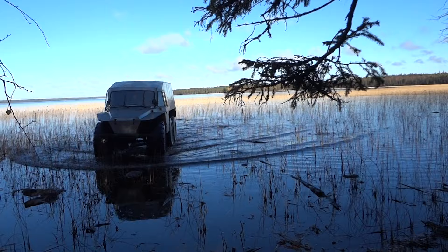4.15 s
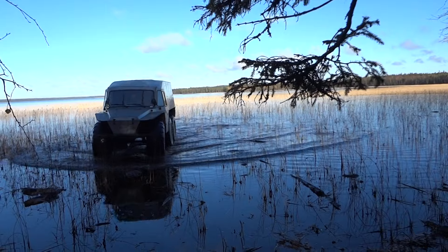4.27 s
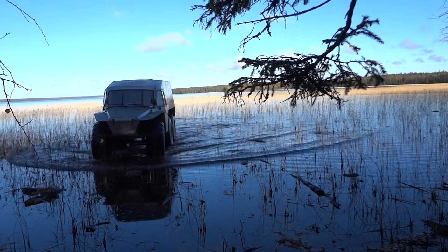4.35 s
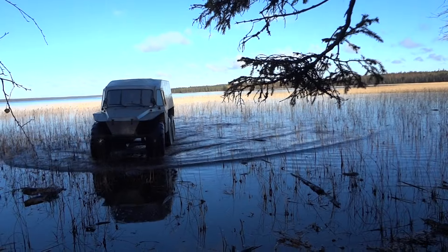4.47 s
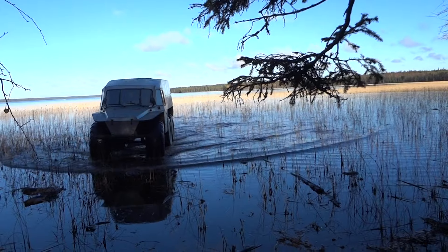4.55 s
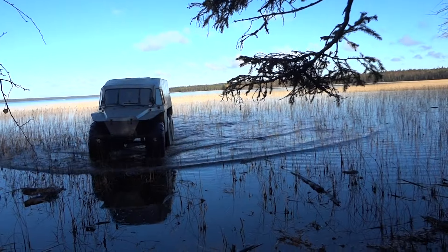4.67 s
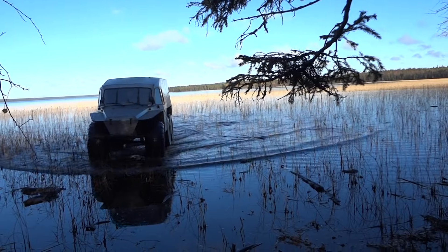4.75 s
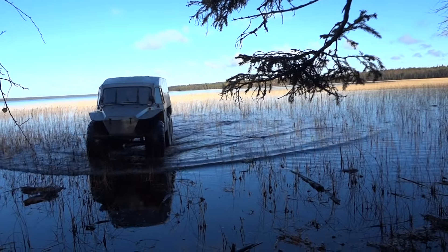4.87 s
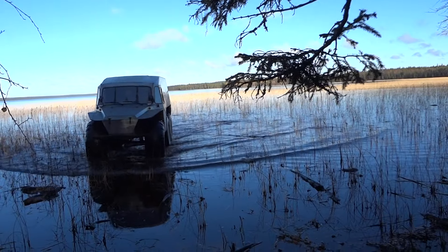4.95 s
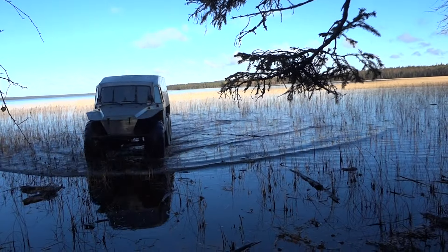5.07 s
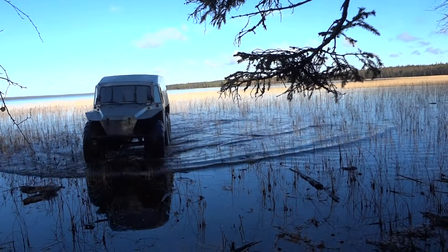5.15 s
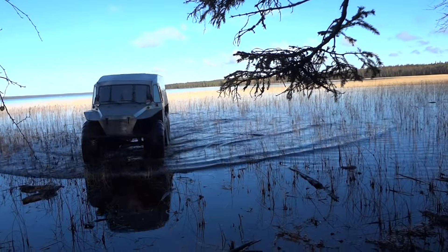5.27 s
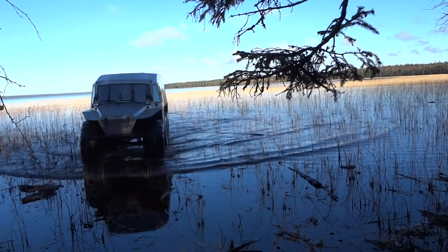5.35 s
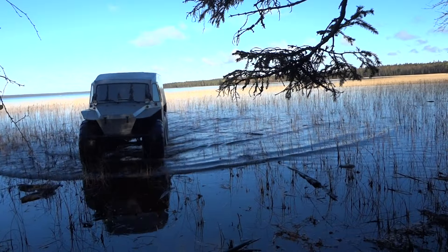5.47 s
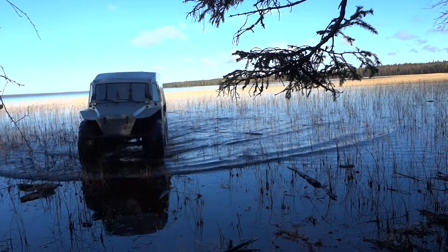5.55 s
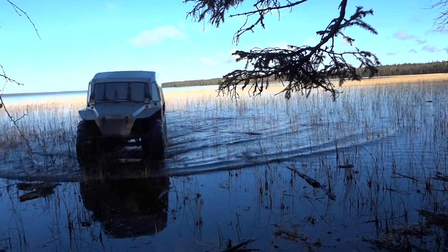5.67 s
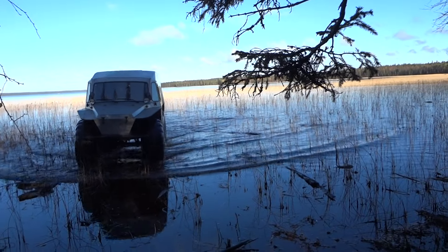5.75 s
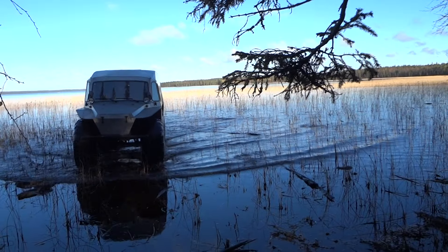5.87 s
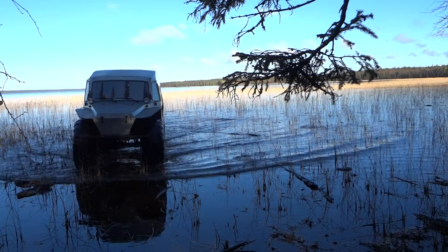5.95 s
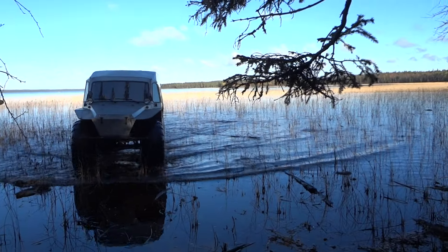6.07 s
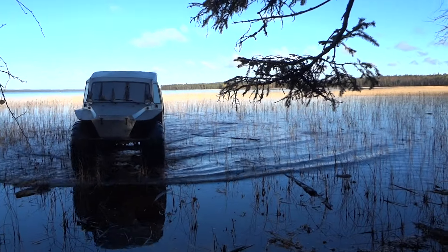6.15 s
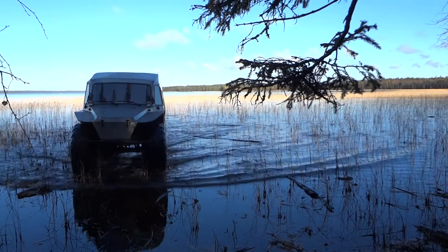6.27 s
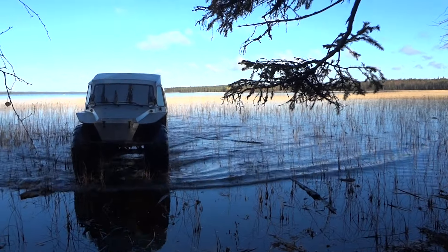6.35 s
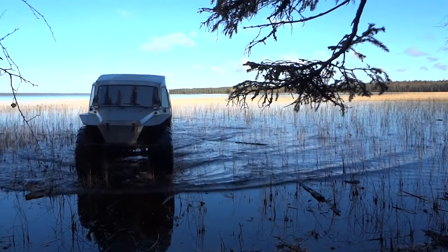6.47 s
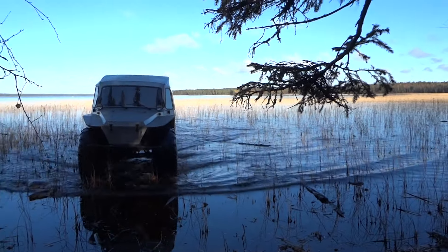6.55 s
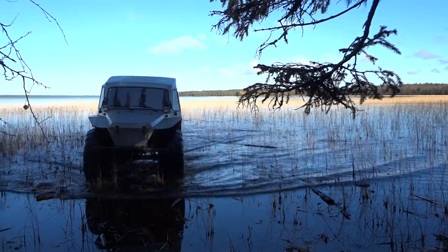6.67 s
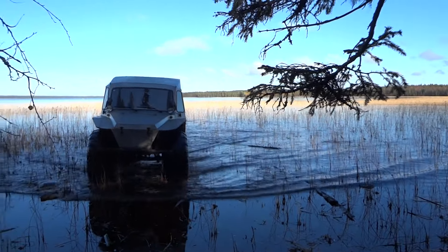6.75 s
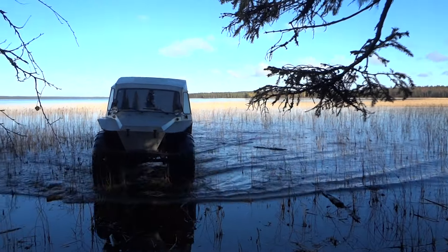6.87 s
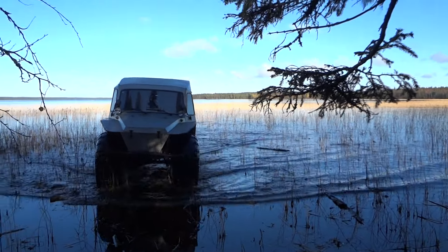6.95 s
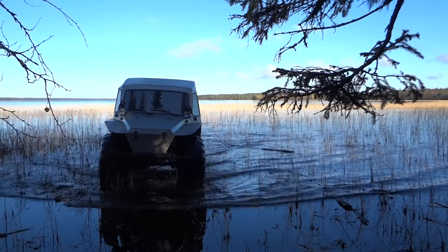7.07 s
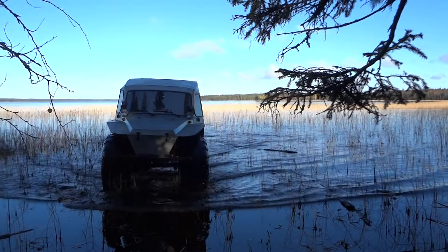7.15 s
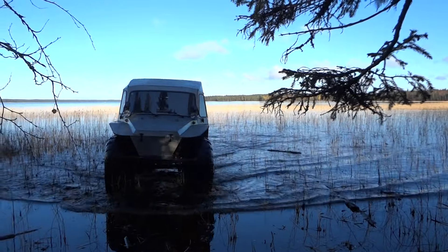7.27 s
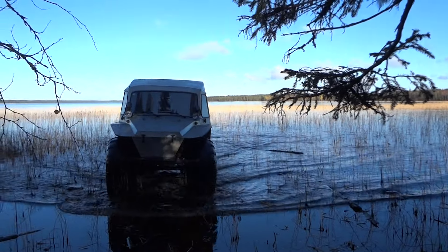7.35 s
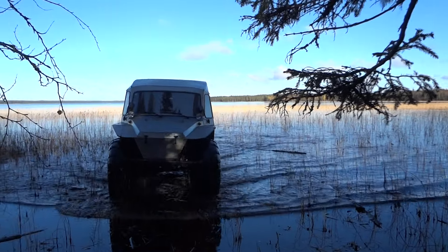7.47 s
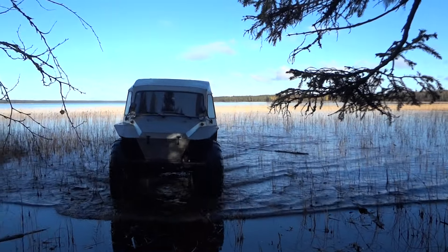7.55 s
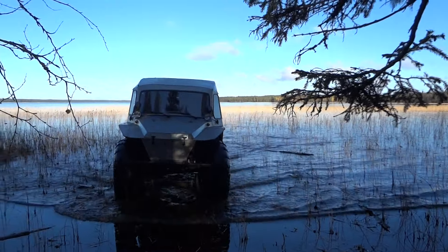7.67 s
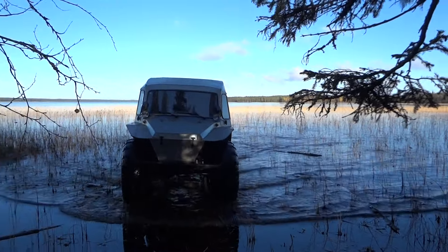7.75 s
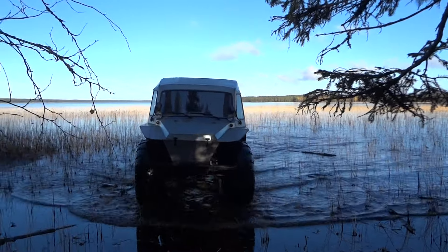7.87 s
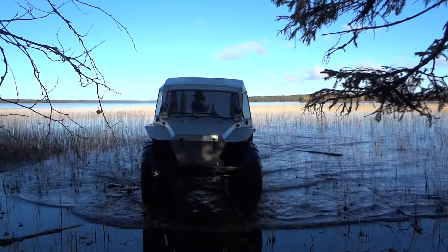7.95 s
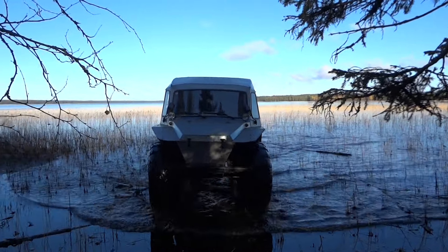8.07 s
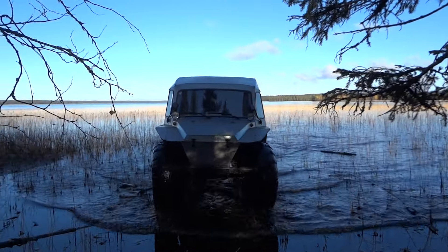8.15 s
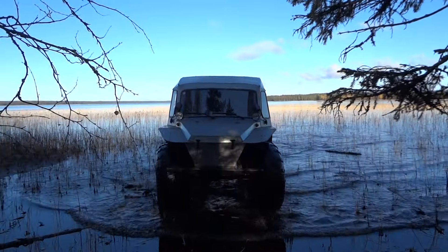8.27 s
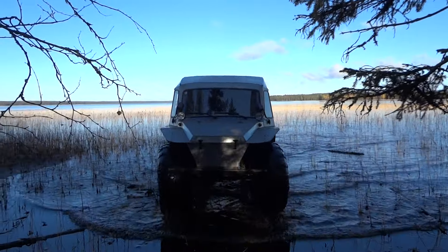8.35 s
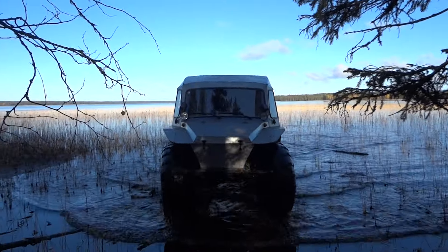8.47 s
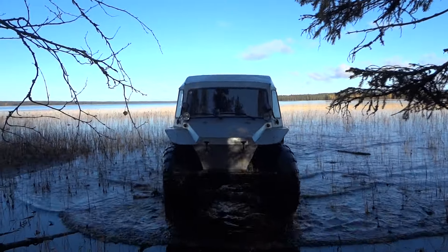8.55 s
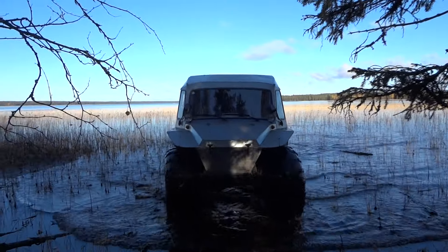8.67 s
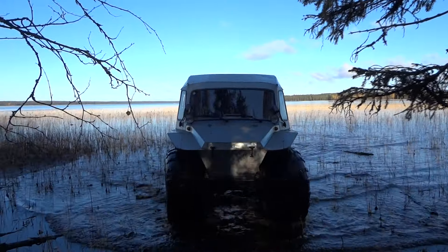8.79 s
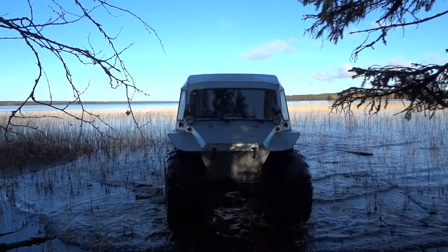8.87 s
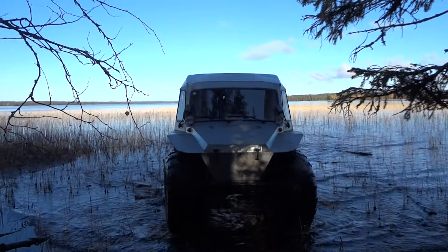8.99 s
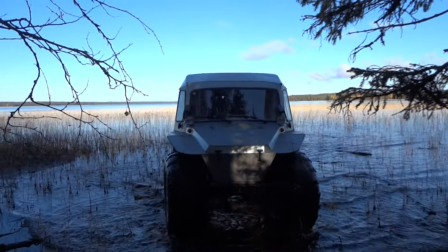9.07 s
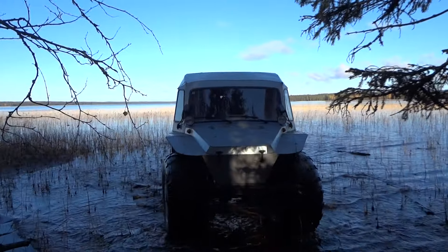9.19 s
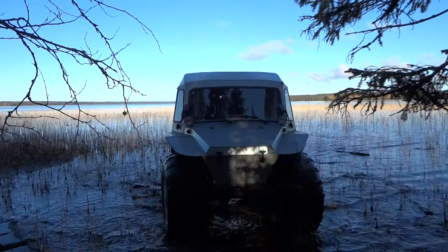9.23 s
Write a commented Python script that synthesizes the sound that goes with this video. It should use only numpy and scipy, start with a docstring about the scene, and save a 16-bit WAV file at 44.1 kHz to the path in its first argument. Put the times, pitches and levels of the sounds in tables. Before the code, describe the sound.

Outdoors at a reedy lake shore, a big-wheeled vehicle wades toward a fixed, close-paired stereo microphone. Its muffled low engine drones steadily with soft surges about once a second, over a dull hull rumble. Tyres churn water continuously; from about three seconds it comes closer, and the wash grows louder and brighter, with more splashes, gurgles and a deep plop near the end.

```python
"""In a shallow, reedy lake, a big-wheeled all-terrain vehicle wades towards a listener on the shore.
Its muffled engine, a stack of sine notes tied to the shaft, drones and surges about once a second;
between surges it slows from about 1850 to 1670 rpm. The hull and tyres add a rumble of filtered noise.
The tyres churn the water: clouds of ringing bubbles over noise grow louder and brighter as it nears.
Single plops (sines rising in pitch) and splashes (short, ragged bursts of noise) stand out on top."""
import sys
import numpy as np
from scipy import signal
from scipy.fft import rfft, irfft, next_fast_len
from scipy.io import wavfile
from scipy.ndimage import uniform_filter1d, map_coordinates

SR = 44100
rng = np.random.default_rng(int(sys.argv[2]) if len(sys.argv) > 2 else 0)


def waveform_to_disk(signal):
    """Save audio, clipped to [-1, 1], as 16-bit WAV at the path in sys.argv[1]."""
    frames = np.transpose(np.atleast_2d(signal))
    scaled = np.clip(frames, -1, 1) * 32767
    samples = np.round(scaled).astype(np.int16)
    wavfile.write(sys.argv[1], SR, samples)


N = 424241  # length in samples, about 9.6 s


def amp(db):
    """Turn decibels into a gain."""
    return 10 ** (np.asarray(db) / 20)


def unit(x):
    """Scale a signal to an rms (average strength) of 1."""
    return x / np.sqrt(np.mean(x ** 2) + 1e-20)


def along(points, hz):
    """Read a value between (f/Hz, value) points, with frequency on a log axis."""
    f, value = np.transpose(points)
    return np.interp(np.log(hz + 1), np.log(np.abs(f) + 1), value)


def curves(rows):
    """Turn each column after the time into a curve with one value per sample."""
    times, *columns = np.transpose(rows)
    return [np.interp(np.arange(N) / SR, times, column) for column in columns]


def wobble(rate):
    """Draw a smooth random curve through `rate` random points a second."""
    coarse = np.arange(0, N + 32, 32)
    knots = rng.standard_normal(4096)
    smooth = map_coordinates(knots, [coarse * rate / SR], mode="wrap")
    return np.interp(np.arange(N), coarse, smooth)


def filtered(x, response):
    """Multiply the spectrum of x by a response (a function of frequency, possibly complex)."""
    m = next_fast_len(N + 8192, True)
    return irfft(rfft(x, m) * response(np.fft.rfftfreq(m, 1 / SR)), m)[..., :N]


def coloured(x, spectrum):
    """Filter x by a table of gains, then bring it to rms 1."""
    return unit(filtered(x, lambda hz: amp(along(spectrum, hz))))


# The vehicle first keeps its distance, then rolls towards the shore: (t/s, distance/m)
DISTANCE = [(0, 13.5), (3, 13.5), (5, 10.54), (6.5, 9.3), (8, 7.9), (9.62, 6.2)]


def closer_db():
    """Level gained since the start: sound grows as one over the distance."""
    metres = curves(DISTANCE)[0]
    return 20 * np.log10(metres[0] / metres)


# Surges of the engine: (t/s at the top, extra speed/turns per second, length/s)
SURGES = [(0.25, 1.72, 1.17), (1.35, 2.36, 1.38), (2.34, 1.89, 1.08), (3.38, 0.63, 0.74),
          (4.14, 0.65, 0.77), (5.02, 1.12, 0.9), (5.64, 0.73, 0.67), (6.33, 2.02, 0.85), (7.22, 2.09, 1.1),
          (8.16, 1.29, 0.89), (9.23, 0.83, 0.58)]


def surging():
    """Extra shaft speed: each surge swells and falls back as a smooth bell."""
    t = np.arange(N) / SR
    extra_speed = np.zeros(N)
    for top_s, extra, length in SURGES:
        extra_speed += extra * np.cos(np.pi * np.clip((t - top_s) / length, -.5, .5)) ** 2
    return extra_speed


# Engine speed between surges, slowing near the shore: (t/s, crankshaft speed/turns per second)
CRUISE = [(0, 30.9), (5.9, 30.93), (6.7, 29.83), (7.8, 29.76), (8.8, 28.7), (9.62, 27.8)]
# Resonances of the exhaust, as the rms level of a strong note at the starting distance,
# before load and wavering: (f/Hz, level/dB)
EXHAUST = [(55, -35), (66, -30), (84, -36.5), (100, -38), (112, -31), (125, -42), (134, -39.5), (168, -35),
           (179, -27), (198, -30.5), (226, -46), (252, -37), (270, -37), (286, -36), (305, -44.5),
           (400, -52.5)]
# Pitches of the strong and of the faint notes: (multiple of the shaft rate)
STRONG_ORDERS = (2, 3, 4, 6, 8)
FAINT_ORDERS = (5, 7, 9, 10, 11, 12)
# How load lifts each strong note: (gain/dB per extra turn a second)
LOAD_DB = [.65, .2, .3, .3, 0.66]
# Each faint note against a strong one of the same pitch: (level/dB)
FAINT_DB = [-16, -18, -9.5, -6, -6, -11.5]


def engine():
    """Two firings a turn make even orders, unequal cylinders odd ones; load and exhaust set their levels."""
    extra = surging()
    speed = curves(CRUISE)[0] + extra
    jitter = 0.0061 * wobble(25)  # radians
    turn = 2 * np.pi * np.cumsum(speed) / SR + jitter
    notes = np.zeros(N)
    for order, load_db in zip(STRONG_ORDERS, LOAD_DB):
        db = along(EXHAUST, order * speed) + load_db * extra + 0.29 * wobble(20)
        polarity = 1 if order == 2 else -1  # the muffler inverts all above the firing note
        notes += polarity * amp(db) * np.sin(order * turn)
    for order, weaker_db in zip(FAINT_ORDERS, FAINT_DB):  # these waver in strength and timing
        db = along(EXHAUST, order * speed) + weaker_db + 1.6 * wobble(5)
        notes += amp(db) * np.cos(order * turn + 1.1 * wobble(1.206))
    uneven_db = 0.27 * wobble(45)  # no two firings are quite equally strong
    return np.sqrt(2) * notes * amp(closer_db() + uneven_db)  # sqrt(2) turns rms into peak


# Colour of the dull rumble from hull and tyres: (f/Hz, level/dB per Hz)
RUMBLE = [(12, -45), (25, -27), (45, -9), (90, 2.5), (150, -5), (230, 1.5), (310, 3), (390, -1), (480, -11),
          (700, -20), (1500, -78)]
# Colour of a body panel ringing faintly: (f/Hz, level/dB per Hz)
PANEL = [(1500, -60), (1830, -13), (1887, -10), (1945, -10), (2400, -65)]
HULL_DB, PANEL_DB = -40.5, -51.5  # rms levels at the start
HULL_GROWS = 1.52  # dB per dB gained by coming closer


def rumble():
    """The hull and the rolling tyres stir a dull, uneven rumble; a panel of the body rings on top."""
    low = amp(HULL_DB + 1.1 * wobble(14)) * coloured(rng.standard_normal(N), RUMBLE)
    ring = amp(PANEL_DB + 2.7 * wobble(8)) * coloured(rng.standard_normal(N), PANEL)
    return amp(HULL_GROWS * closer_db()) * (low + ring)


def bubbles(lo_hz, hi_hz, cycles, spread_db, rise, count, size):
    """A cloud of damped sines of random pitch and strength, each gliding up as it dies."""
    when, pitch, strength = rng.random((count, 3)).T[:, :, None]
    hz = lo_hz + (hi_hz - lo_hz) * pitch
    age = np.arange(size) * hz / SR / cycles  # 1 after the given number of cycles
    gain = amp(-spread_db * np.log(1 - .985 * strength)) * hz / hi_hz
    glide = 1 + rise * np.minimum(age, 2) / 2
    rings = gain * np.exp(-3 * age) * np.sin(2 * np.pi * cycles * age * glide)
    at = (when * N).astype(int) + np.arange(size)
    return unit(np.bincount(at.ravel(), rings.ravel(), N)[:N])  # adds up all the rings


def froth(grains, spectrum, wash_db, patchy_db, side_db):
    """Near bubbles over a noise wash of countless far ones, in random patches of time and pitch, in stereo."""
    mixed = grains + amp(wash_db) * rng.standard_normal(N)
    z = signal.stft(mixed, nperseg=512)[2]
    field = uniform_filter1d(rng.standard_normal(z.shape), size=7, axis=0)
    field = uniform_filter1d(field, size=7, axis=1)
    patchy = signal.istft(z * amp(patchy_db * unit(field)), nperseg=512)[1][:N]
    mid = coloured(patchy, spectrum)
    side = amp(side_db) * coloured(rng.standard_normal(N), spectrum)
    return np.array([mid + side, mid - side])


# Water thrown by the tyres; only its rise and fall around the mean counts: (t/s, level/dB)
WASH = [(0.0, -35.5), (1.63, -32), (3.96, -31), (5.09, -29.5), (5.52, -30.5), (6.83, -26.5), (7.5, -28),
        (8.33, -25.5), (9.46, -25), (9.62, -23.5)]


def wash_swell_db():
    """How far the thrown water is above or below its mean level."""
    wash_db = curves(WASH)[0]
    return wash_db - wash_db.mean()


# Filter colours, from large bubbles to fine drops: (f/Hz, gain/dB)
CHURN = [(250, -37), (450, -13.5), (600, 2), (750, 4), (950, -4.5), (1150, -7), (1500, -16.5), (2000, -16),
         (4000, -59)]
SPLASHING = [(700, -12), (1400, 2), (1900, -0.5), (2300, 1.5), (2800, 0.5), (3700, -2), (4600, -6.5),
             (6000, -20), (10000, -39)]
SPRAY = [(2500, 5.5), (4500, -2.5), (5400, 3), (6500, 0), (7500, -1.5), (9500, -3.5), (12000, -20),
         (15800, -17)]
# Filter colours of the bow wave, its gurgle and its fizz: (f/Hz, gain/dB)
GURGLE = [(700, -30), (1050, -2.5), (1350, 1.5), (1600, -7.5), (2100, -17), (4000, -62)]
FIZZ = [(6000, -34), (9000, -3), (10800, -2), (13000, -6), (15800, -12)]
CHURN_DB, SPLASHING_DB, SPRAY_DB = -31, -37, -39  # at the mean level of the wash
CHURN_GROWS, SPLASHING_GROWS, SPRAY_GROWS = 0.75, 1.06, 1.12  # dB per dB of wash: more is brighter
GURGLE_DB, FIZZ_DB = -47, -57  # at the start
BOW_GROWS = 2.1  # dB per dB gained by coming closer


def water():
    """Treads churn up large bubbles; water falling off the tyres splashes and bursts into spray."""
    swell_db = wash_swell_db() + 0.35 * wobble(4)
    sheets, patter = wobble(16), wobble(70)  # each sheet of water drives large, small and fine together
    large = bubbles(393, 1680, cycles=8.8, spread_db=0.5, rise=0.22, count=7000, size=700)
    small = bubbles(1016, 5790, cycles=5.4, spread_db=2.0, rise=0.16, count=14000, size=260)
    drops = bubbles(4180, 16700, cycles=8.7, spread_db=4.0, rise=.05, count=14000, size=70)
    churn_db = CHURN_DB + CHURN_GROWS * swell_db + 0.27 * sheets + 0.28 * wobble(60)
    splashing_db = SPLASHING_DB + SPLASHING_GROWS * swell_db + 0.48 * sheets + 0.32 * patter
    spray_db = SPRAY_DB + SPRAY_GROWS * swell_db + 0.19 * sheets + 0.69 * patter
    churn = amp(churn_db) * froth(large, CHURN, wash_db=7, patchy_db=.5, side_db=-18.5)
    splashing = amp(splashing_db) * froth(small, SPLASHING, wash_db=6, patchy_db=0.6, side_db=-18.5)
    spray = amp(spray_db) * froth(drops, SPRAY, wash_db=5.0, patchy_db=0.53, side_db=-36)
    # close up, the bow wave's own gurgle and fizz come through
    middling = bubbles(966, 1990, cycles=8.8, spread_db=1.0, rise=0.07, count=4000, size=600)
    gurgle_db = GURGLE_DB + 0.36 * sheets
    gurgle = amp(gurgle_db) * froth(middling, GURGLE, wash_db=7.5, patchy_db=1.5, side_db=-28)
    tiny = bubbles(5500, 13700, cycles=4, spread_db=3.5, rise=.05, count=30000, size=40)
    fizz_db = FIZZ_DB + 0.81 * patter
    fizz = amp(fizz_db) * froth(tiny, FIZZ, wash_db=0, patchy_db=1.0, side_db=-43)
    bow_wave = amp(BOW_GROWS * closer_db()) * (gurgle + fizz)
    return churn + splashing + spray + bow_wave


# Single bubbles and drips: (t/s, level/dB from which the ring dies away, f/Hz at the start)
PLOPS = [(.243, -33, 8100), (2.941, -25, 2000), (4.488, -27, 9100), (8.515, -18.5, 1900),
         (8.528, -19, 2000), (9.153, -6.5, 690)]


def plops():
    """An air pocket rings briefly, rising in pitch; small ones ring for more cycles."""
    out, t = np.zeros(N + SR), np.arange(SR // 10) / SR
    for s, db, hz in PLOPS:
        t60 = .028 * (hz / 700) ** -.15  # seconds to fall by 60 dB
        onset = 1 - np.exp(-t / .0003)
        ring = np.sin(2 * np.pi * hz * t * (1 + 3 * t)) * onset
        out[round(s * SR):][:len(t)] += amp(db - 60 * t / t60) * ring
    return out[:N]


def small_splashes(count):
    """Extra splashes at random times and pitches, louder as the wash grows; rows like those of SPLASHES."""
    when, strength, pitch = rng.random((count, 3)).T
    lo_hz, hi_hz = 700, 4200  # range of centres
    at = (when * N).astype(int)
    level_db = -33.5 + wash_swell_db()[at] + 5 * strength
    centres_hz = lo_hz * (hi_hz / lo_hz) ** pitch
    length = .035  # seconds
    return [(s, db, hz, length) for s, db, hz in zip(when * N / SR, level_db, centres_hz)]


# Single splashes and gulps:
# (t/s, level/dB before fading and dulling, centre f/Hz, length/s in which it fades by 24 dB)
SPLASHES = [(2.048, -24, 750, .068), (2.936, -26, 6160, 0.021), (3.225, -30, 3500, 0.023),
            (3.641, -33, 7000, 0.018), (4.673, -28, 2300, 0.052), (5.409, -31, 792, 0.045),
            (5.452, -28, 2200, .056), (5.485, -30, 11000, .025), (5.734, -24, 730, 0.031),
            (5.93, -23, 950, .07), (5.963, -29, 4480, 0.023), (6.295, -27, 3000, .02),
            (6.635, -21.5, 735, 0.079), (7.038, -21, 790, .035), (8.078, -20, 800, .064),
            (8.08, -27, 5500, .09), (8.51, -19.5, 1150, .08), (8.979, -23.5, 10170, 0.016),
            (9.12, -24, 750, 0.047), (9.19, -24, 4500, .025), (9.256, -22, 8500, .032),
            (9.361, -25, 8000, 0.026), (9.455, -21, 1400, .05), (9.569, -17.5, 1500, 0.028),
            (9.576, -17, 3500, .02)]
# Treble lost on the way from a splash: (f/Hz, gain/dB)
DULLING = [(6000, -0.5), (9500, -4), (12000, -4), (15800, -16)]


def splashes():
    """A slap of water: a ragged burst of droplets around one size, thinning out over its length."""
    out, t = np.zeros(N + SR), np.arange(SR // 5) / SR
    hz = np.fft.rfftfreq(len(t), 1 / SR) + 1
    for s, db, centre_hz, length in list(SPLASHES) + small_splashes(count=22):
        band = amp(-7 * np.log2(hz / centre_hz) ** 2)
        droplets = unit(irfft(rfft(rng.standard_normal(len(t))) * band, len(t)))
        ragged_db = 2.0 * unit(uniform_filter1d(rng.standard_normal(len(t)), size=60))
        onset = 1 - np.exp(-15 * t / length)
        out[round(s * SR):][:len(t)] += amp(db + ragged_db - 24 * t / length) * droplets * onset
    return filtered(out[:N], lambda hz: amp(along(DULLING, hz)))


# Strength of an early reflection: (f/Hz, gain as a plain factor)
MIRROR = [(100, .02), (450, 0.36), (1500, .23), (3200, .38), (5500, 0.28), (8000, 0.16), (15000, .08)]
# Its delay drifts slowly: (t/s, delay/ms)
MIRROR_DELAY = [(0, 1.15), (1.5, 1.12), (4.4, 1.105), (6.5, 1.152), (9.62, 1.153)]


def reflected(x):
    """A copy about 1 ms late and a quarter cycle turned combs the rush into slowly shifting hollow bands."""
    echo = filtered(x, lambda hz: 1j * along(MIRROR, hz))  # 1j is the quarter-cycle turn
    now = np.arange(N)
    then = now - curves(MIRROR_DELAY)[0] * SR / 1000
    return x + np.array([np.interp(then, now, side) for side in echo])


def scene():
    """Engine and water come from one place ahead, which drifts a little to the right as it nears."""
    metres = curves(DISTANCE)[0]
    drift_db = 0.13 * (metres - metres.mean())  # left minus right, 0.13 dB per metre
    pan_db = drift_db * np.array([[.5], [-.5]])
    wet_sounds = reflected(water() + splashes() + plops())
    return amp(pan_db) * (engine() + rumble() + wet_sounds)


# Level difference of the two ports: (f/Hz, left minus right level/dB)
LEAN = [(60, -2), (200, -1.6), (400, -0.5), (700, 0.5), (1300, 1.2), (2000, 1.5), (6000, 2.4), (9000, 0.5),
        (12000, -0.5)]
# Phase difference of the two ports: (f/Hz, lead of the left/radians)
LEAD = [(60, -0.11), (120, -0.71), (220, -0.61), (430, -0.95), (1000, -0.53), (2000, -0.47), (3000, -0.21),
        (8000, -0.31), (14000, 0.048)]
TOP_HZ = 15800  # nothing is kept from here up


def record(dry):
    """Two close microphone ports differ in level and phase; a band limit cuts off the highest treble."""
    ports = np.array([[.5], [-.5]])  # half of each difference goes to either side

    def port_response(hz):
        """Gain and phase turn of each port."""
        return amp(ports * along(LEAN, hz)) * np.exp(1j * ports * along(LEAD, hz))

    pair = filtered(dry, port_response)
    return filtered(pair, lambda hz: hz < TOP_HZ)


dry = scene()
out = record(dry)
waveform_to_disk(out)
```